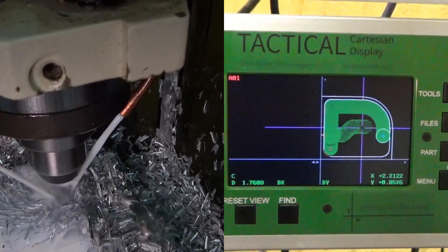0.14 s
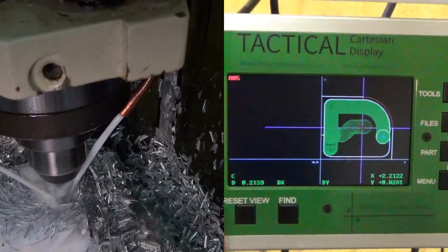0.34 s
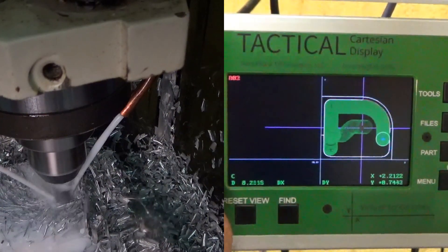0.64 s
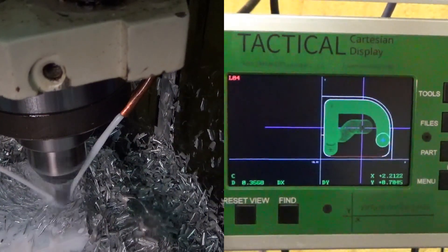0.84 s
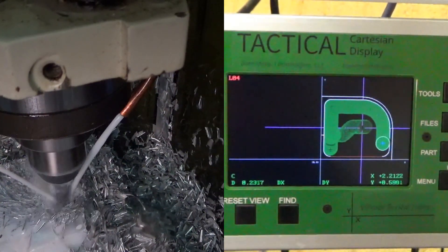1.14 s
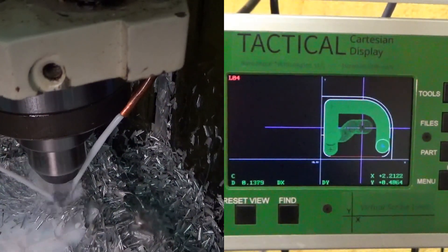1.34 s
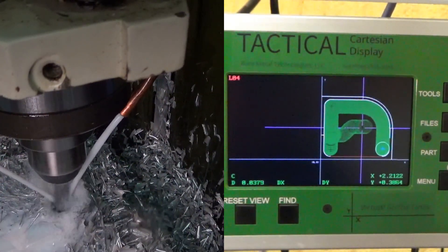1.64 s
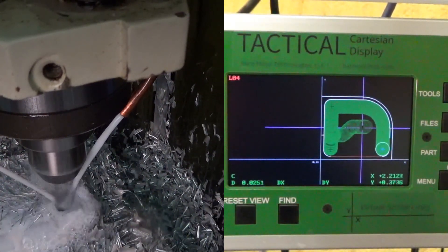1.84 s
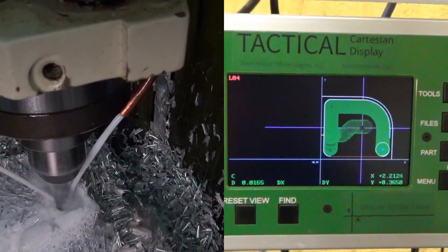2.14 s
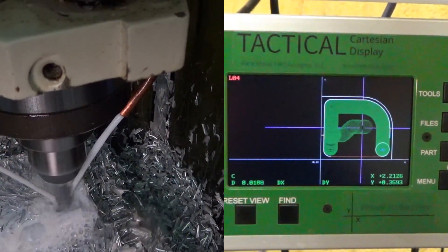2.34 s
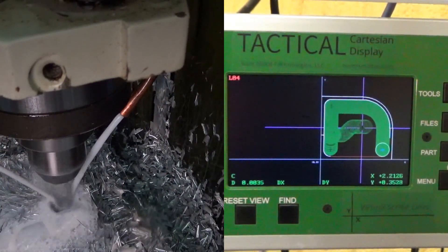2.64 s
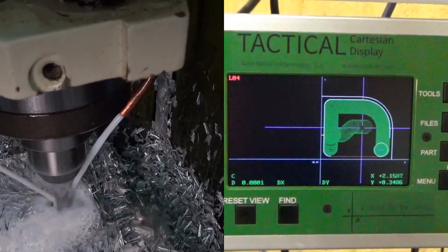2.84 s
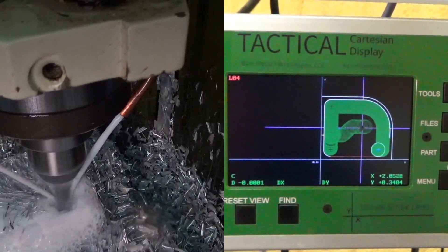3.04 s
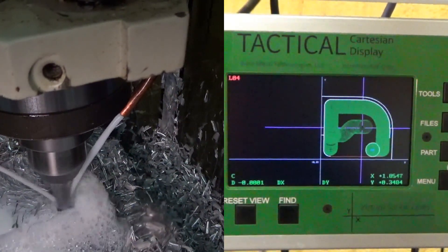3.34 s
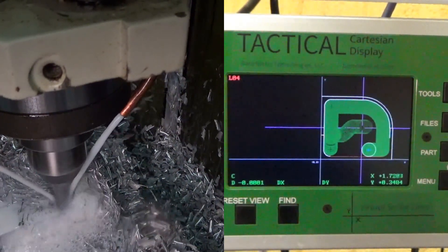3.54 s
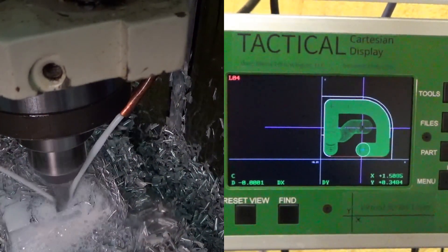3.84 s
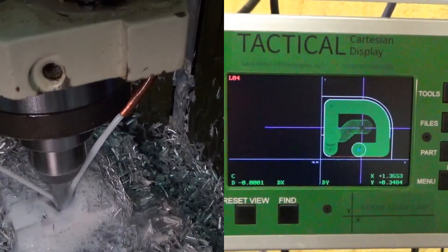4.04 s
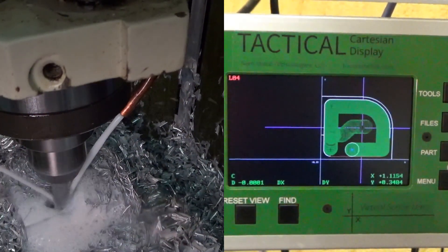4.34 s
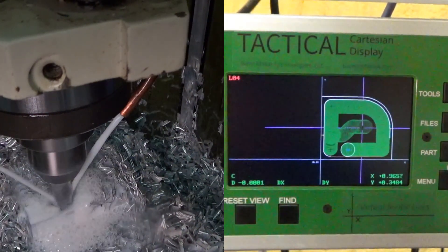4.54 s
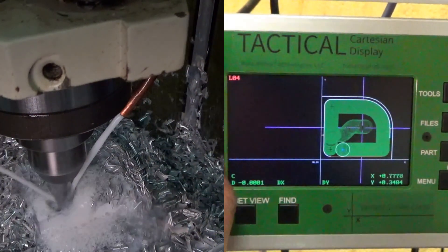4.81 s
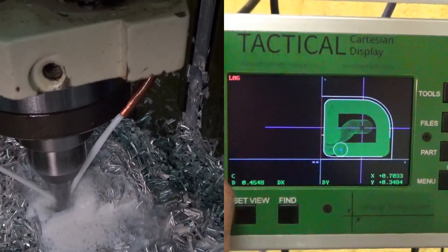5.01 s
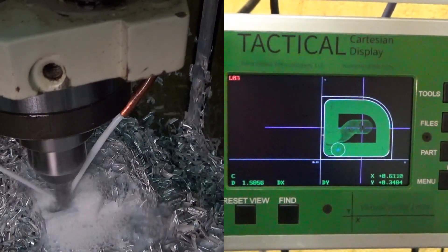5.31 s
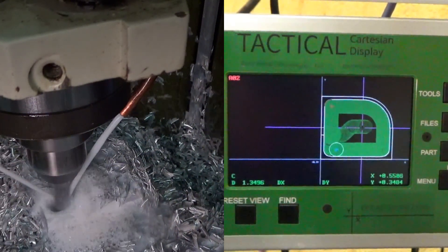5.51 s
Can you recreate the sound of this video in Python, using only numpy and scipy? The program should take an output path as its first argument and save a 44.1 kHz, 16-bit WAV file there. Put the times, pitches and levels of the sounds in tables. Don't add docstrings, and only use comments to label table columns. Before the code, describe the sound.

A milling cutter grinds through metal under hissing coolant, whining and crackling, then bursts into a loud high squeal that stops dead as cutting continues.

```python
import sys
import numpy as np
from scipy import signal
from scipy.io import wavfile

SR = 44100
rng = np.random.default_rng(int(sys.argv[2]) if len(sys.argv) > 2 else 0)


def volts_from_decibels(level):
    exponent = np.asarray(level, float) / 20
    return 10 ** exponent


def wav_record(signal):
    frames = np.transpose(np.atleast_2d(signal))
    bounded = np.clip(frames, -1, 1)
    quanta = np.round(bounded * 32767).astype(np.int16)
    wavfile.write(sys.argv[1], SR, quanta)


N = 250047
STEP = 40
COARSE_S = np.arange(N // STEP + 2) * STEP / SR
TIME_S = np.arange(N) / SR
CORNER_S = 2.805

# (time [s], rate [turns/s])
SPINDLE_SPEED = [(0, 98.11), (1.7, 98.11), (1.72, 98.0), (2.8, 98.0), (2.82, 98.14), (5.67, 98.14)]
# (time [s], load [dB])
CUTTING_LOAD = [(0, -0.5), (.3, 0), (1.0, 0), (1.4, 0.5), (1.47, 0.5), (1.55, 0.5), (1.8, -2), (3.2, 0.5),
                (3.5, 0.9), (3.86, 0), (4.02, 1.4), (4.12, 0), (4.2, 1), (4.3, 0), (4.65, -0.35),
                (4.9, 0.9), (5.25, -0.04), (5.67, -1)]
GAIN_CENTRES_HZ = (130, 700, 1500, 2800, 9000)
# (share of load [1], squeezed level [dB], further sag [dB/s],
# level left at the corner [dB], recovery [s])
GAIN_RANGES = [
    (0.4, -6, 1.5, 4, 0.35),
    (0.7, -10.5, -9.5, -5.5, 0.33),
    (1.0, -10, -4, -7, 0.37),
    (1.26, -9, -8.5, -8, 0.4),
    (1.54, -4.5, -1, -5.5, 0.43),
]
SQUEEZE_S, SQUEEZE_ATTACK_S = 1.819, 0.0086
# (time [s], level [dB])
TABLE_SHUDDERS = [(.56, 6.5), (3.15, 10), (3.6, 6.5)]
SHUDDER_FADE_S, RUMBLE_REST_DB = 0.71, -4

# (frequency [Hz], density [dB/Hz])
NOISE_SPECTRUM = [(25, -33), (100, -20), (250, -17.5), (435, -13.5), (620, -10.5), (1070, -8),
                  (1350, -12.5), (1800, -8.5), (2310, -3), (4400, -8.5), (5410, -5.5), (6810, -12),
                  (10000, -12), (13500, -12)]
# (frequency [Hz], width [Hz], level [dB])
HOUSING_MODES = [(2080, 380, 2.5), (4000, 440, 5.5), (5390, 430, 7), (6320, 230, 6.5), (8000, 610, 8.5),
                 (11200, 370, 2)]
NOISE_DB = -38
# (frequency [Hz], correlation [1])
EAR_LIKENESS = [(60, 0.44), (130, 0.98), (280, 0.77), (620, 0.88), (1340, 0.94), (2910, 0.8), (6320, 0.58),
                (10000, 0.34), (13700, 0.39)]
# (frequency [Hz], left minus right [dB])
STEREO_BALANCE = [(60, -1), (130, 1.5), (280, 1.0), (620, -0.5), (1340, 2.5), (2910, 3), (6320, 3.0),
                  (11000, 6), (13700, 1)]

ORDER_MULTIPLES = (1, 3, 5, 7, 10, 13, 14, 16, 17, 20, 22, 25, 26, 27, 28, 29, 31, 34, 36, 37, 40, 46, 60,
                   62, 65, 66, 72, 44, 47)
# (level before the corner [dB], level after it [dB])
ORDER_LEVELS = [(-82.5, -79), (-66, -65.5), (-64, -67), (-72, -92), (-60, -61), (-64, -70), (-68, -64),
                (-62, -62.5), (-63.5, -65.5), (-59, -59), (-56, -54.5), (-65, -87), (-56, -52),
                (-55, -56.5), (-56, -53), (-71, -63), (-57.5, -55), (-55, -58.5), (-57, -57), (-55, -57.5),
                (-57, -58.5), (-55, -62), (-64, -58), (-66, -60), (-68, -56), (-67, -56.5), (-65, -79),
                (-73, -63.5), (-51.5, -57)]
# (order [1], resting level before the corner [dB], after it [dB])
RESTING_ORDERS = [(8, -59, -61), (11, -58, -55), (48, -54, -54.5), (50, -66, -78), (42, -57.5, -58.5),
                  (51, -74, -70)]
# (time [s], length [s], order [1], level [dB])
ORDER_SWELLS = [(0.143, 0.16, 48, -49.5), (0.6, 0.35, 48, -45), (0.408, 0.24, 48, -49),
                (1.028, 0.28, 48, -41), (1.3, 0.41, 48, -46.5), (1.688, 0.19, 48, -43),
                (1.947, 0.15, 48, -49), (3.168, 0.073, 48, -48), (3.423, 0.11, 48, -49),
                (4.2, .08, 48, -52), (0.954, 0.68, 8, -53.5), (3.164, 0.85, 8, -55), (4.753, 0.83, 8, -56),
                (.03, .03, 50, -50), (.16, .03, 50, -51), (.28, .03, 50, -48), (0.437, 0.29, 50, -49.5),
                (.75, 0.23, 50, -53), (1.0, 0.041, 50, -42), (1.156, 0.051, 50, -42.5),
                (1.693, 0.23, 50, -41), (1.46, 0.17, 50, -44), (1.96, 0.16, 50, -52),
                (3.127, 0.075, 50, -48), (4.85, 0.66, 51, -57), (.4, 0.6, 8, -57.5),
                (1.54, 0.084, 11, -56.5), (3.55, .12, 48, -52), (4.3, .06, 48, -57), (5.1, 0.12, 50, -52),
                (4.745, 0.16, 42, -52), (5.207, 0.42, 42, -51), (2.818, 0.35, 11, -49.5),
                (3.104, 0.59, 11, -46), (3.782, 0.24, 11, -47), (4.293, 0.052, 11, -49.5),
                (4.514, 0.11, 11, -50.5), (4.788, 0.24, 11, -46), (5.178, 0.35, 11, -45)]
SWELL_RISE_S, SWELL_FALL_S = 0.1, 0.25

# (frequency [Hz], level [dB])
MACHINE_LINES = [(600, -53.5), (1730, -62), (1766.5, -49), (1801, -60), (2015, -56), (2263, -59),
                 (2296, -56.5), (2366, -50.5), (2994, -61.5), (4167, -56.5), (8419, -64), (9695, -59.5),
                 (10252, -60), (10449, -58.5), (10504, -53.5), (11145, -58), (11317, -64.5)]
# (time [s], frequency [Hz], level [dB])
FEED_MOTORS = [(0, 436, -66), (1.8, 436, -66), (1.85, 436, -110), (2.8, 822, -110), (2.81, 822, -57),
               (3.1, 812, -57), (3.3, 798, -60), (3.45, 790, -80), (5.67, 790, -100)]

# (time [s], blow on the tool [dB], blow on the table [dB])
CAUGHT_CHIPS = [(0.309, -30, -52), (0.383, -26.5, -36), (0.4305, -27, -35), (0.5155, -33, -45),
                (0.574, -26, -31), (0.6557, -29, -40), (0.719, -26, -41), (.8679, -38, -45),
                (1.0006, -36, -42), (1.0127, -30, -40), (1.0394, -34, -10.5), (1.2, -33, -37),
                (1.371, -27, -43), (1.4406, -26, -44), (1.453, -23, -46), (1.462, -24, -46),
                (1.4698, -21, -49), (1.487, -32, -49), (1.594, -29, -57.5), (1.603, -28, -50),
                (1.6113, -28.5, -63), (1.625, -26.5, -53), (1.6345, -25.5, -50), (1.642, -30, -44),
                (1.757, -29, -53.5), (2.095, -38, -42), (2.25, -36, -38), (3.32, -26.5, -40),
                (3.3662, -25, -34), (3.5127, -32, -41.5), (3.5233, -28, -41), (3.532, -28.5, -42),
                (3.706, -38, -40), (3.9482, -24, -19), (3.9985, -21.5, -36), (4.062, -36, -42),
                (4.114, -26, -42), (4.194, -37, -32), (4.2053, -22, -30), (4.216, -25, -40),
                (4.7655, -25.5, -30), (4.825, -42, -47), (4.867, -26, -44), (4.886, -26, -44),
                (4.916, -28, -42), (5.001, -25.5, -46), (5.0785, -25.5, -51), (5.101, -31, -49),
                (5.1622, -25, -36), (5.194, -28, -35), (5.221, -24, -9), (5.2307, -26, -16),
                (5.3155, -29, -33.5), (5.3544, -28, -27), (5.5475, -30, -34)]
# (frequency [Hz], level [dB], 60 dB decay [s])
TOOL_MODES = [(4940, 2, 0.009), (5230, 3, 0.014), (5350, 3, .016), (5500, 5, 0.012), (5720, 1, 0.006),
              (6170, -2, 0.006)]
# (frequency [Hz], level [dB], 60 dB decay [s])
TABLE_MODES = [(1000, -3, .03), (1500, -5, .02), (2000, -2, .015), (2520, 0, .02), (3050, -3, .012),
               (3650, -3, .012), (4150, -2, .012)]
# (time [s], peak level [dB], frequency [Hz])
FLYING_CHIPS = [(0.1501, -37, 11200), (0.1785, -39, 8300), (0.2388, -39, 10500), (0.8385, -43, 10600),
                (1.3024, -43, 10550), (2.1994, -46, 11300), (3.1722, -40.5, 10500), (3.9963, -39, 8400),
                (4.17, -40.5, 10400), (5.1926, -39, 8700), (5.2909, -43, 11200), (5.579, -43, 9900)]

SQUEAL_START_S, SQUEAL_RISE_S, SQUEAL_FIRST_DB = 1.675, 0.037, -34.5
SQUEAL_FULL_S, SQUEAL_GROW_S, SQUEAL_FULL_DB = 1.806, 0.012, -27.6
SQUEAL_STOP_S = 0.004
# (time [s], frequency [Hz])
SQUEAL_PITCH = [(1.72, 5480), (1.77, 5450), (2.05, 5462), (2.2, 5474), (2.23, 5462), (2.57, 5474),
                (2.6, 5458), (2.8, 5476)]
PULL_HZ = 14
LOCK_ORDER = 56
# (time [s], length [s], loss [dB])
SWING_FALTERS = [(1.92, 0.028, 2), (2.182, 0.028, 2.5), (2.47, .03, 1.5), (2.569, .015, 2.5),
                 (2.018, .01, 2), (1.795, .005, 3.5), (2.654, 0.024, 1.5), (2.74, 0.049, 1),
                 (3.36, .005, 8.5), (3.403, .01, 13), (3.66, 0.021, 3), (3.914, .01, 3), (3.98, .01, 8),
                 (4.035, .01, 3), (4.267, 0.011, 5), (4.406, 0.054, 7), (4.593, 0.03, -1), (4.977, .01, 14),
                 (5.127, .02, 4), (5.26, 0.029, 7)]
FALTER_EDGE_S = 0.0256
# (level re tone [dB], level per loss [dB/dB])
SQUEAL_SIDES = [
    (-4.5, -0.5),
    (-5.5, -.5),
    (-6, 1.5),
]
LOCKED_SIDES_DB = (-1.5, -5, -9)
SIDE_FLICKER_DB = (1.6, 1.5)
OUTER_OFFSETS = (-10, -8, -6, -5, -4, -3, 1, 2, 4, 5, 6, 9, 10, 12, 14)
OUTER_DB = (-30, -25, -23, -27, -23, -14, -11.5, -13, -25, -27, -24, -23, -27, -39, -27)
OUTER_LOCK_SHIFTS_DB = (1, 1, 1, 1, 1, 5, -4, -3, 1, 1, 1, 1, 1, 1, 1)
# (time [s], level [dB])
LOCKED_RING = [(2.83, -52.5), (2.93, -51), (2.96, -44.5), (3.2, -38.5), (3.54, -36), (3.68, -43),
               (3.71, -38.5), (4.02, -43), (4.22, -35), (4.26, -40), (5.11, -45), (5.13, -61), (5.15, -41),
               (5.23, -46), (5.28, -67), (5.31, -41), (5.4, -47), (5.67, -45)]
RING_TONE_DB = -3.5
PEAK_PHASE, TOOTH_LAG = (0.95, 1.95), (2.15, 0)
UPPER_LINES_S, UPPER_GAIN_DB = 2.22, 1
SETTLE_S, YOUNG_TONE_DB = (1.95, 2.4), -3.5
TIRE_S, TIRED_UPPER_DB = (2.5, 2.8), -6
LOOSE_S, LOOSE_TONE_DB, LOOSE_SIDES_DB = (4.7, 4.8), -2.5, 5.5
BREAKOUT_TONE_DB, BREAKOUT_SIDES_DB = -4, 8
THIRD_LOSS_DB = -9
SWING_LIMIT = 0.17


def fine(control):
    return np.interp(TIME_S, COARSE_S, control)


def columns(rows):
    s, *rest = np.transpose(rows)
    return [np.interp(COARSE_S, s, c) for c in rest]


def at_hz(points, hz):
    points_hz, values = np.transpose(points)
    return np.interp(np.log(hz), np.log(points_hz), values)


def drift(rate):
    r = np.exp(-2 * np.pi * STEP * rate / SR)
    white = rng.standard_normal(len(COARSE_S) + 2000)
    slow = signal.lfilter([1], [1, -2 * r, r * r], white)[2000:]
    return slow / slow.std()


def pulse(s, length, rise, fall):
    return np.clip(np.minimum((COARSE_S - s) / rise, (s + length - COARSE_S) / fall) + 1, 0, 1)


def placed(x, hz):
    return x * volts_from_decibels(at_hz(STEREO_BALANCE, hz) / 2 * np.array([[1], [-1]]))


def tone(phase, db, flicker_db, blur):
    swing = np.sqrt(2) * volts_from_decibels(db + flicker_db * drift(15.0)) * np.exp(1j * blur * drift(9.8))
    apart = np.exp(0.6j * blur * drift(4.0))
    turning = np.exp(1j * phase)
    return np.real([fine(swing * apart) * turning, fine(swing / apart) * turning])


def ring(clicks, hz, t60):
    r, w = volts_from_decibels(-60 / (t60 * SR)), 2 * np.pi * hz / SR
    return signal.lfilter([0, np.sin(w)], [1, -2 * r * np.cos(w), r * r], clicks + 1e-18)


def machine_gains():
    load_db, = columns(CUTTING_LOAD)
    since, after = COARSE_S - SQUEEZE_S, COARSE_S - CORNER_S
    closing = np.clip(since / SQUEEZE_ATTACK_S, 0, 1)
    levels = []
    for share, squeezed_db, sag_db, left_db, recovery in GAIN_RANGES:
        sinking = closing * (squeezed_db + sag_db * since)
        recovering = left_db * np.clip(1 - after / recovery, 0, 1)
        levels.append(share * load_db + np.where(after < 0, sinking, recovering))
    shudders = sum(db * np.exp(-np.abs(COARSE_S - s) / SHUDDER_FADE_S) * (COARSE_S > s)
                   for s, db in TABLE_SHUDDERS)
    levels[0] = levels[0] + RUMBLE_REST_DB + shudders
    return levels


def gain_db(levels, hz):
    weights = [np.interp(np.log(hz), np.log(GAIN_CENTRES_HZ), row) for row in np.eye(len(GAIN_CENTRES_HZ))]
    return sum(w * level for w, level in zip(weights, levels))


def coolant_and_cutting(levels, turn):
    out, together = 0, drift(18)
    edges = 28 * 2 ** np.arange(0, 9.2, 1 / 3)
    white = rng.standard_normal((2, 2, N))
    teeth = 0.21 * np.cos(turn) + 0.033 * np.cos(2 * turn)
    for k, (low, high) in enumerate(zip(edges, edges[1:])):
        band_pass = signal.butter(2, [low, high], "band", fs=SR, output="sos")
        mid, side = signal.sosfilt(band_pass, white[k % 2])
        hz = np.sqrt(low * high)
        alike = np.clip(at_hz(EAR_LIKENESS, hz), 0, 1)
        bright = np.clip(np.log2(hz / 1500) / 1.6, 0, 1)
        ducked_db = gain_db(levels, hz) * (0.35 if hz > 11500 or hz < 70 else 1)
        patchy_db = 1.4 * bright * together + 1.55 * drift(4.6)
        gain = fine(volts_from_decibels(at_hz(NOISE_SPECTRUM, hz) + ducked_db + patchy_db))
        band = np.sqrt(1 + alike) * mid + np.sqrt(1 - alike) * side * [[1], [-1]]
        out = out + placed(gain * (1 + bright * teeth) * band, hz)
    for hz, width, db in HOUSING_MODES:
        out = out + (volts_from_decibels(db) - 1) * signal.lfilter(*signal.iirpeak(hz, hz / width, SR), out)
    return volts_from_decibels(NOISE_DB) * out / out[:, :SR].std()


def swelling_db(order, resting_db):
    heights = [resting_db]
    for s, length, k, db in ORDER_SWELLS:
        if round(k) == round(order):
            same_side = (s > CORNER_S) <= (COARSE_S > CORNER_S)
            heights.append(db - 30 * (1 - pulse(s, length, SWELL_RISE_S, SWELL_FALL_S) * same_side))
    return np.max(heights, axis=0)


def spindle(levels, turn):
    after = COARSE_S > CORNER_S
    smeared_db = -4.0 * ((COARSE_S > 1.85) & ~after)
    start = rng.uniform(0, 2 * np.pi, len(ORDER_LEVELS))
    out = 0
    for k, (before_db, after_db), p in zip(ORDER_MULTIPLES, ORDER_LEVELS, start):
        db = np.where(after, after_db, before_db) + smeared_db + gain_db(levels, 98 * k)
        out = out + placed(tone(k * turn + p, db, min(2.65, 1.3 + 0.11 * k), 0.011 * k), 98 * k)
    for k, before_db, after_db in RESTING_ORDERS:
        k = round(k)
        db = swelling_db(k, np.where(after, after_db, before_db) + gain_db(levels, 700))
        out = out + placed(tone(k * turn, db + 1.5, 1 + 0.014 * k, 0.015 * k), 98 * k)
    return out


def whines(levels):
    feed_hz, feed_db = columns(FEED_MOTORS)
    out = tone(2 * np.pi * np.cumsum(fine(feed_hz)) / SR, feed_db, 1.3, 0.13)
    for hz, db in MACHINE_LINES:
        line_db = db + gain_db(levels, min(hz, 5000))
        out = out + placed(tone(2 * np.pi * hz * TIME_S, line_db, 1.0, 0.3), hz)
    return out


def chips(levels):
    n = np.arange(400)
    burr = rng.standard_normal((len(CAUGHT_CHIPS), 400)) * np.exp(-n / 320.0) * np.minimum(n / 60.0, 1)
    burr /= np.sqrt(np.mean(burr ** 2, axis=1, keepdims=True)) * 2.84
    clumps = fine(160 * volts_from_decibels(8.7 * drift(12)))
    small = (rng.random(N) < clumps / SR) * rng.standard_normal(N)
    small = small * fine(volts_from_decibels(-25.0 + gain_db(levels, 2800)))
    tool, table = small.copy(), np.zeros(N)
    for (s, tool_db, table_db), hit in zip(CAUGHT_CHIPS, burr):
        i = round(s * SR)
        tool[i:i + 400] += volts_from_decibels(tool_db) * hit
        table[i:i + 400] += volts_from_decibels(table_db) * hit
    out = volts_from_decibels(-36) * (tool - small)
    out += sum(volts_from_decibels(db - 27.0) * ring(tool, hz, t60) for hz, db, t60 in TOOL_MODES)
    out += sum(volts_from_decibels(db - 38.0) * ring(table, hz, t60) for hz, db, t60 in TABLE_MODES)
    t = np.arange(300) / SR
    for (s, db, hz), noise in zip(FLYING_CHIPS, rng.standard_normal((len(FLYING_CHIPS), 300))):
        tick = np.sin(2 * np.pi * hz * t) + 0.68 * np.diff(noise, prepend=0)
        i = round(s * SR)
        out[i:i + 300] += volts_from_decibels(db + 3.5) * tick * np.exp(-t / 0.0061)
    return placed(signal.sosfilt(signal.butter(2, 700, "high", fs=SR, output="sos"), out), 8200)


def chatter_controls():
    squealing = COARSE_S < CORNER_S
    loss_db = sum(db * pulse(s, length, FALTER_EDGE_S, FALTER_EDGE_S) for s, length, db in SWING_FALTERS)
    hz = columns(SQUEAL_PITCH)[0] + PULL_HZ * np.clip(loss_db / 2.21, 0, 1)
    unrisen = np.clip(1 - (COARSE_S - SQUEAL_START_S) / SQUEAL_RISE_S, 0, 1)
    grown = np.clip((COARSE_S - SQUEAL_FULL_S) / SQUEAL_GROW_S, 0, 1)
    stopping = np.clip(1 + (COARSE_S - CORNER_S) / SQUEAL_STOP_S, 0, 1)
    squeal_db = SQUEAL_FIRST_DB - 23 * unrisen - 25 * stopping + (SQUEAL_FULL_DB - SQUEAL_FIRST_DB) * grown
    ring_db = columns(LOCKED_RING)[0] + RING_TONE_DB + drift(3.6)
    tone_db = np.where(squealing, squeal_db, ring_db) - loss_db
    flicker_db = np.where(squealing, *SIDE_FLICKER_DB)
    sides = [tone_db + np.where(squealing, db + follows * loss_db, locked_db) + flicker_db * drift(4.9)
             for (db, follows), locked_db in zip(SQUEAL_SIDES, LOCKED_SIDES_DB)]
    return hz, tone_db, *sides


def chatter(turn):
    free = TIME_S < CORNER_S
    hz, tone_db, below_db, above_db, first_db = chatter_controls()
    carrier = np.where(free, 2 * np.pi * np.cumsum(fine(hz)) / SR, LOCK_ORDER * turn)
    locked, late = (COARSE_S >= CORNER_S).astype(int), COARSE_S > UPPER_LINES_S
    early = np.clip(1 - (COARSE_S - SQUEAL_FULL_S) / SQUEAL_GROW_S, 0, 1)
    settled, loose = np.interp(COARSE_S, SETTLE_S, (0, 1)), np.interp(COARSE_S, LOOSE_S, (0, 1))
    tired_db = TIRED_UPPER_DB * np.interp(COARSE_S, TIRE_S, (0, 1)) * (1 - locked)

    # (distance from the tone in turns, level dB)
    lines = [(-2, below_db + LOOSE_TONE_DB * loose),
             (3, above_db + THIRD_LOSS_DB * settled - 5.5 * early),
             (-1, first_db + LOOSE_SIDES_DB * loose)]
    for k, db, shift_db in zip(OUTER_OFFSETS, OUTER_DB, OUTER_LOCK_SHIFTS_DB):
        upper_db = UPPER_GAIN_DB * (k == 2) * late + tired_db * (0 < k < 3)
        lines.append((k, tone_db + db + upper_db + shift_db * locked + LOOSE_SIDES_DB * loose))

    young_db = YOUNG_TONE_DB * (0.5 - settled) * (0.5 - early)
    centre_db = tone_db + BREAKOUT_TONE_DB * early + young_db + LOOSE_TONE_DB * loose
    wave = fine(volts_from_decibels(centre_db + 0.6 * drift(24))) + 0j
    for k, db in lines:
        tooth_rate = k % 2 == 0 or k == -3
        phase = k * np.take(PEAK_PHASE, locked) + np.take(TOOTH_LAG, locked) * tooth_rate
        db = db + BREAKOUT_SIDES_DB * early * (0.5 if abs(k) < 3 else 1)
        line = volts_from_decibels(db + 2 * drift(15)) * np.exp(1j * phase + 0.2j * drift(12))
        wave = wave + fine(line) * np.exp(1j * k * turn)

    grit = signal.lfilter([0.12], [1, -0.88], rng.standard_normal((2, N)))
    wander = fine(np.sqrt(2) * np.exp(1j * 0.24 * drift(40)) * (COARSE_S > SQUEAL_START_S))
    rough = 1 + np.where(free, 0.27, 0.9) * (grit[0] + 1j * grit[1])
    wave = wave * wander * np.exp(1j * carrier) * rough
    height = np.abs(wave) / SWING_LIMIT + 1e-9
    wave = wave * np.tanh(height) / height

    onset = np.clip((COARSE_S - 1.79) / 0.043, 0, 1)
    octave_gain = fine(volts_from_decibels(-tone_db + 2.2 * drift(30)) * onset) * free
    octave = np.real(wave ** 2 * (1 + 1.6 * grit[0])) * octave_gain
    octave = octave + 3 * signal.lfilter(*signal.iirpeak(11350, 22, SR), octave)
    octave_band = signal.butter(3, [9900, 12000], "band", fs=SR, output="sos")
    octave = signal.sosfilt(octave_band, octave) * volts_from_decibels(-35.5)

    lag = fine(np.exp(1j * 0.23 * drift(27)))
    left_db = np.where(free, 2.9, 1.5) * np.array([[1], [-1]])
    tool_band = signal.butter(2, [4200, 8200], "band", fs=SR, output="sos")
    heard = signal.sosfilt(tool_band, np.real([wave * lag, wave / lag]))
    return heard * volts_from_decibels(left_db) + placed(octave, 11000)


def scene():
    turn = 2 * np.pi * np.cumsum(fine(columns(SPINDLE_SPEED)[0])) / SR
    levels = machine_gains()
    steady = coolant_and_cutting(levels, turn) + spindle(levels, turn) + whines(levels)
    return steady + chips(levels) + chatter(turn)


def roll_off(x):
    return signal.sosfilt(signal.butter(12, 14330, fs=SR, output="sos"), x)


def record(dry):
    low_pass = signal.ellip(12, 0.5, 75, 13020, fs=SR, output="sos")
    mix = signal.sosfilt(low_pass, dry)
    return roll_off(mix)


dry = scene()
out = record(dry)
wav_record(out)
```